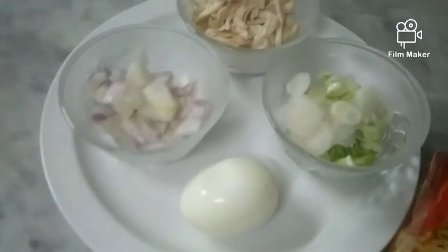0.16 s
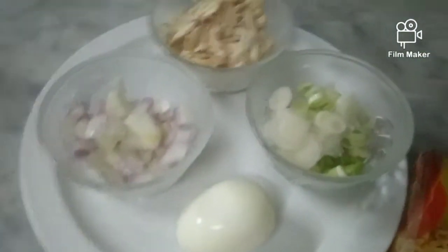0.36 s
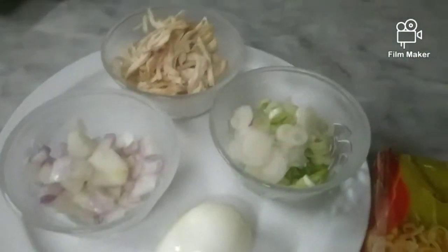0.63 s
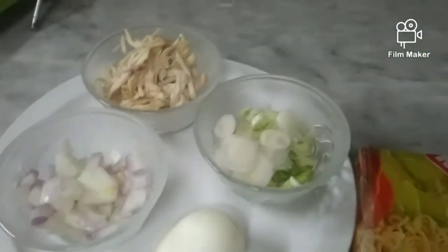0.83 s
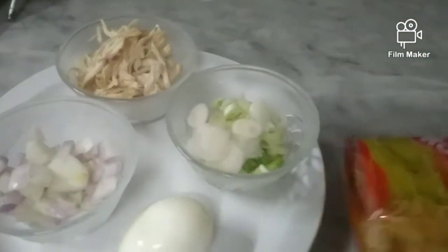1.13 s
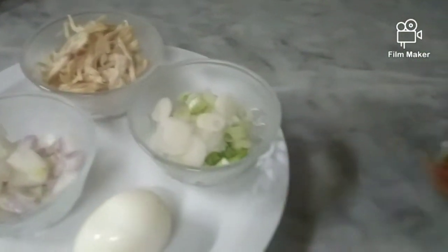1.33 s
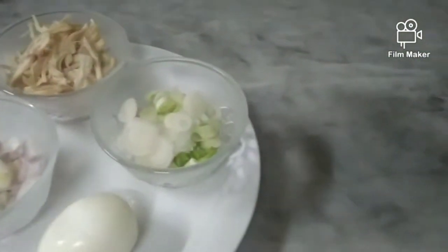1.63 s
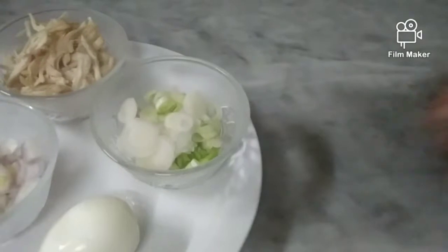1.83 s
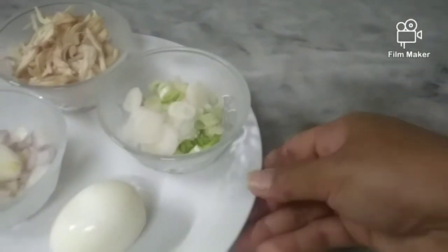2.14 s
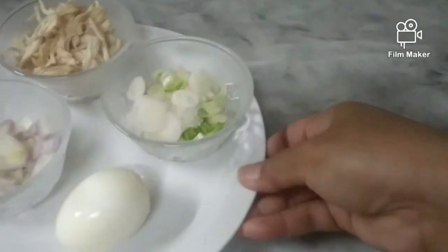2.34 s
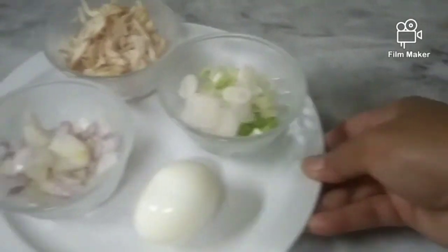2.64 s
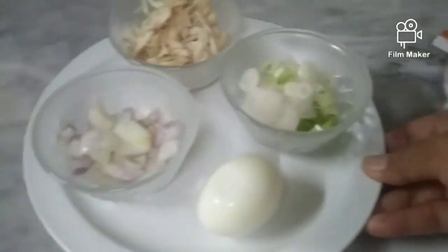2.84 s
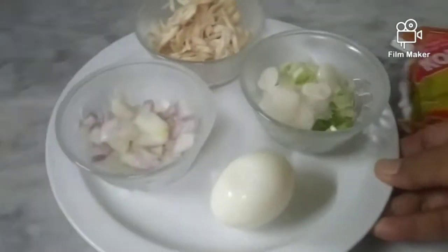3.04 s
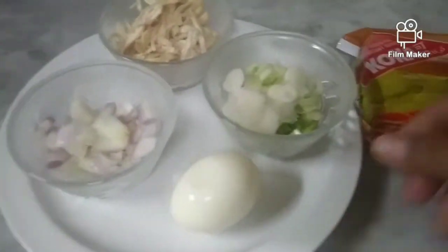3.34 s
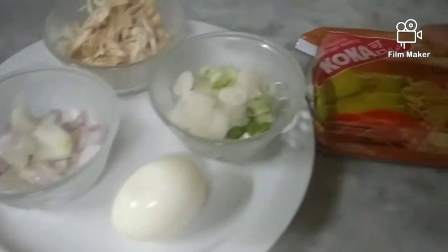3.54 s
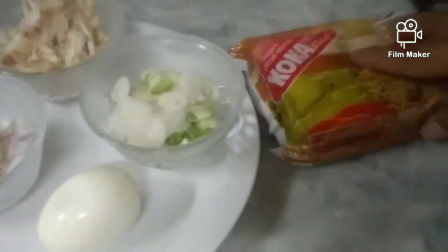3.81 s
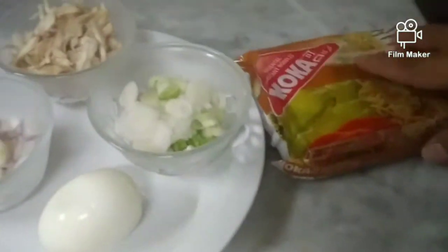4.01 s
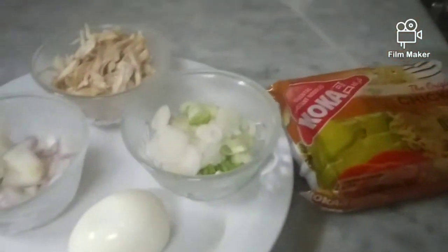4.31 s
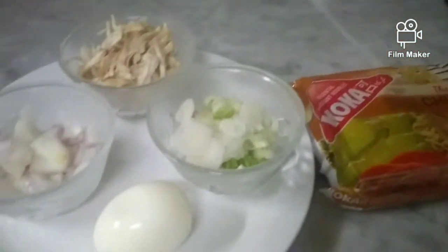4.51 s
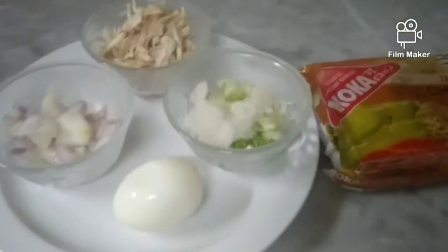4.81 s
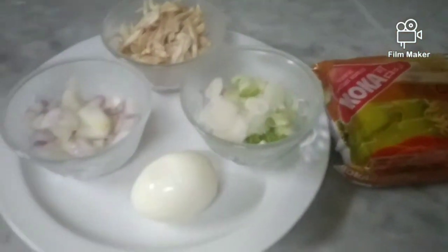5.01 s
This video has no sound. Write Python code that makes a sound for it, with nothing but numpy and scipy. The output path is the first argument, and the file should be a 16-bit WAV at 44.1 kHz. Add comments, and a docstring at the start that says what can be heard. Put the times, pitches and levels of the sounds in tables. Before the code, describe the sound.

Close by in a small, slightly echoing kitchen, thin plastic snaps and rustles as a packet of dry noodles is lifted. Next a china plate grates over the stone counter for about a second, chinking and juddering as it stops. The packet comes back, crinkling and bumping softly down, then scuffs across the counter in brief pushes. A faint appliance hum continues underneath.

```python
"""A crinkle and a sharp snap of plastic film: a noodle packet is picked up from a stone kitchen counter.
Its creases snap over a fine rustle and its panels buckle with hollow pops. A china plate is slid round,
its unglazed foot grating on the stone and ringing the plate's modes. Then the packet is laid down with
dull thuds and dragged in short shoves. A small hard room answers, over a low appliance hum."""
import sys
import numpy as np
from scipy import signal
from scipy.fft import rfft, irfft
from scipy.io import wavfile
from scipy.ndimage import uniform_filter1d

SR = 44100
rng = np.random.default_rng(int(sys.argv[2]) if len(sys.argv) > 2 else 0)


def store_wav(level_fs):
    """Save 16-bit WAV to argv[1]."""
    pcm = np.round(np.clip(np.atleast_2d(level_fs), -1, 1) * 32767)
    wavfile.write(sys.argv[1], SR, pcm.T.astype(np.int16))


N = 227732
TIME = np.arange(N) / SR


def undb(db):
    """Decibels to gain."""
    return 10 ** (np.asarray(db) / 20)


def unit(x):
    """Scale to rms 1."""
    return x / np.sqrt(np.mean(x ** 2))


def response(points, size=2048):
    """Causal impulse response with the given (Hz, dB) spectrum."""
    hz, db = np.transpose(points)
    grid = np.maximum(np.arange(size // 2 + 1) * SR / size, 1)
    gain = undb(np.interp(np.log(grid), np.log(hz), db))
    cepstrum = irfft(np.log(gain))
    cepstrum[1:size // 2] *= 2
    cepstrum[size // 2 + 1:] = 0
    return irfft(np.exp(rfft(cepstrum)))


def colour(x, points, size=2048):
    """Filter with a (Hz, dB) spectrum."""
    return signal.fftconvolve(x, response(points, size))[:len(x)]


def resonate(x, hz, width_hz):
    """One resonance, gain 1 at its centre."""
    return signal.lfilter(*signal.iirpeak(hz, hz / width_hz, fs=SR), x)


def ring(slips, modes):
    """Every slip strikes another spot, so each mode takes its own share of it."""
    out = np.zeros(N)
    for hz, width, db in modes:
        share = resonate(slips * rng.standard_normal(N), hz, hz / 2)
        out += undb(db) * resonate(share, hz, width)
    return unit(out)


def wander(rate_hz):
    """Smooth random drift, spread near 1."""
    span = max(int(SR / rate_hz), 2)
    steps = np.repeat(rng.standard_normal(N // span + 1), span)
    return np.sqrt(2) * uniform_filter1d(steps, span)[:N]


def ticks(per_s, spread_db):
    """Random tiny impulses; a positive spread makes a few stronger, a negative one a few weaker."""
    size_db = spread_db * np.minimum(rng.exponential(size=N), np.pi)
    return (rng.random(N) < per_s / SR) * undb(size_db) * rng.choice([-1, 1], N)


def stroke(start_s, attack_s, hold_s, release_s):
    """One movement of the hand: it builds up, holds and dies away."""
    since = TIME - start_s
    return np.clip(since / attack_s, 0, 1) * np.exp(-np.maximum(since - attack_s - hold_s, 0) / release_s)


def strokes(rows, attack_s, release_s):
    """Gain curve of several alike movements, from (start s, hold s, dB) rows."""
    return sum(undb(db) * stroke(s, attack_s, hold_s, release_s) for s, hold_s, db in rows)


def arch(start_s, length_s):
    """Half a sine: from rest up to 1 and back to rest."""
    along = (TIME - start_s) / length_s
    return np.maximum(np.sin(np.pi * along), 0) * (along > 0) * (along < 1)


def add(track, s, sound):
    """Mix a sound in at a given time."""
    start = max(int(s * SR), 0)
    track[start:start + len(sound)] += sound[:N - start]


def hit(sound, db):
    """Scale a short sound so that its total energy sits at the given level."""
    return undb(db) * sound / np.linalg.norm(sound)


# Grips on the packet. Each row: start in seconds, hold in seconds, relative level in dB.
GRIPS = [(-0.03, 0.0088, -46), (0.96, 0.11, -35), (1.15, 0.16, -35.5), (1.47, 0.1, -50), (1.65, 0.093, -45),
         (3.645, 0.005, -36.5), (3.705, 0.053, -37), (4.02, 0.065, -42.5), (4.34, 0.045, -49.5)]

def squeeze():
    """How hard the fingers crumple the film; drives the crinkle and the small snaps."""
    return strokes(GRIPS, attack_s=0.0095, release_s=0.07)


# Film sliding over film. Each row: start, attack and hold in seconds, relative level in dB.
SLIDES = [(-0.03, 0.0091, 0.03, -49), (0.65, 0.23, 0.1, -57), (1.172, 0.31, 0.092, -36.5),
          (1.69, 0.024, 0.06, -52), (3.639, 0.04, 0.19, -42.5), (3.87, 0.22, 0.096, -50),
          (4.337, 0.032, 0.036, -58.5)]
# EQ for the mid-heavy crinkle and the bright sliding hiss. Each row: frequency in Hz, gain in dB.
CRINKLE_EQ = [(100, -19.5), (300, 7), (600, 5), (1000, 7.5), (2500, 4.5), (4000, 1.5), (6500, -2.5),
              (9000, -19), (16000, -28)]
HISS_EQ = [(1500, -8), (4000, -1), (6500, -2.5), (8300, -6), (10000, 4.5), (11300, -4), (13000, -15),
           (15500, -11)]

def rustle(crinkle_db=-2, hiss_db=-1, hollow_db=2):
    """Countless small creases give way in flurries and ring the packet's hollow; sliding film hisses."""
    creases = unit(ticks(per_s=900, spread_db=1.0) * undb(2 * wander(70)))
    grains = unit(ticks(per_s=6000, spread_db=0.0) * undb(3.15 * wander(90)))
    hollow = undb(hollow_db) * resonate(creases, hz=1330, width_hz=340)
    crinkle = unit(colour(creases, CRINKLE_EQ) + hollow) * squeeze()
    sliding = sum(undb(db) * stroke(s, attack, hold, release_s=0.064) for s, attack, hold, db in SLIDES)
    hiss = unit(colour(grains + .5 * creases, HISS_EQ)) * sliding
    return undb(crinkle_db) * crinkle + undb(hiss_db) * hiss


# EQ for the low room tone. Each row: frequency in Hz, gain in dB.
ROOM_TONE_EQ = [(25, -31), (48, -4.5), (100, 0), (160, 0.5), (240, -7), (360, -1.5), (600, -7.5),
                (1000, -12), (1600, -16.5), (3000, -26), (8200, -33.5), (9300, -30), (11600, -28.5),
                (12800, -39)]
# Partials of an appliance's hum. Each row: frequency in Hz, level in dB.
HUM = [(97, -55), (124, -56.5), (194, -58.5), (291, -63), (533, -69.5)]
# Slow swell of a thin high hiss. Each row: time in seconds, level in dB.
WHINE_SWELL = [(0, -91), (4.3, -68), (4.7, -71), (5.16, -67.5)]

def kitchen(air_db=-49, whine_hz=9200, whine_width_hz=300):
    """The bed under it all: room tone, a wavering appliance hum and a thin high hiss that creeps in."""
    air = unit(colour(rng.standard_normal(N), ROOM_TONE_EQ, size=8192)) * undb(air_db + .5 * wander(20))
    hum = np.zeros(N)
    for hz, db in HUM:
        peak = np.sqrt(2) * undb(db + 2.73 * wander(9))
        pitch_hz = hz + 2.34 * wander(12)
        hum += peak * np.sin(2 * np.pi * np.cumsum(pitch_hz) / SR)
    band = resonate(rng.standard_normal(N), whine_hz, whine_width_hz)
    swell = undb(np.interp(TIME, *np.transpose(WHINE_SWELL)))
    whine = unit(resonate(band, whine_hz, whine_width_hz)) * swell
    return air + hum + whine


def small_snaps(per_s=60, above_squeeze_db=23, spread_db=2.5, treble_db=-3, treble_spread_db=7):
    """Lesser creases snap at random, as strong as the squeeze of the moment; returns rows like SNAPS."""
    chance = rng.standard_normal(size=(400, 4))
    times = np.cumsum((chance[:, 0] ** 2 + chance[:, 1] ** 2) / 2) / per_s
    squeeze_db = 20 * np.log10(np.interp(times, TIME, squeeze()) + 1e-9)
    levels = squeeze_db + above_squeeze_db + spread_db * chance[:, 2]
    trebles = treble_db + treble_spread_db * chance[:, 3]
    return list(np.column_stack([times, levels, trebles])[times < TIME[-1]])


# The featured crease snaps. Each row: start in seconds, relative level in dB, treble lift in dB.
SNAPS = [(0.1045, 8, -5), (0.2328, -16, -20), (0.26, -15, -27), (0.279, -15.5, -13), (0.3017, -9.5, -15),
         (0.5581, -21.5, 12), (0.562, -11.5, 3.5), (0.9502, -7, 7), (0.9892, -6, -15), (1.0161, -3, 1),
         (1.0556, 4.5, 10), (1.1208, 0.5, 1), (1.126, -4.5, 5), (1.1567, 6, -1), (1.162, -4.5, 11.5),
         (1.1738, 0.5, 4), (1.25, -5.5, 3), (1.2693, 0.5, 8.5), (1.2774, 4, -10), (1.2923, 11.5, -6),
         (1.3122, -1, -5), (1.358, 6.5, -3), (1.6663, -6, -8), (1.7425, -7, -19), (1.7713, 0.5, -5.5),
         (1.8163, -11, 2), (1.8921, -13.5, -2), (3.6542, -6, -5), (3.6666, -2, -5), (3.671, 4, 0),
         (3.73, -0.5, 4), (3.7344, -0.5, -10), (3.757, -4.5, 6.5), (3.78, 3, -17), (3.8896, -0.5, -5.5),
         (3.9866, -5, -16), (4.0695, -5, -11), (4.0821, 6, -4), (4.185, -13, 6.5), (4.264, -14.5, -8),
         (4.2832, -10.5, -5)]
# The film's tone, laid over every snap. Each row: frequency in Hz, gain in dB.
FILM_EQ = [(80, -50), (250, -1), (600, -3.5), (1200, 2), (3000, -1.5), (6000, -2), (8300, -7), (10200, 2.5),
           (11500, -6), (13000, -12.5), (16000, -22)]

def snaps(shiver_s=0.0019, shiver_db=-2.5, slack_body_db=4):
    """Each crease flips with a sharp spike, then the film shivers; returns direct and all-round sound."""
    direct, around, t = np.zeros(N), np.zeros(N), np.arange(SR // 40) / SR
    # the film damps treble at once, so mostly the middle range shivers on
    damping = signal.butter(1, 3500, fs=SR, output="sos")
    for s, db, treble_db in SNAPS + small_snaps():
        # slack creases give way softly and sound hollow, taut ones crack loud and thin
        body_db = min(-0.5 - 0.9 * db, slack_body_db)
        tone = [(500, body_db - 3.0), (1300, body_db), (2300, 0), (3800, 0), (8000, treble_db)]
        spike = undb(db) * response(tone)
        shiver = signal.sosfilt(damping, rng.standard_normal(len(t))) * np.exp(-t / shiver_s)
        click = hit(shiver, shiver_db)
        click[0] = 1  # the flip itself
        add(direct, s, signal.fftconvolve(hit(click, 0), spike))
        # summed over all directions the shiver's colour evens out
        add(around, s, spike)
    return colour(direct, FILM_EQ), colour(around, FILM_EQ)


# Hollow pops. Each row: start in seconds, level in dB, pitch in Hz, bandwidth in Hz.
POPS = [(0.281, -12, 1520, 350), (0.559, -12.5, 1780, 220), (0.5621, -8.5, 1870, 198),
        (0.5625, -7, 2130, 218), (0.9507, -10, 1200, 400), (1.059, -3.5, 1370, 198), (1.19, -4, 1970, 600),
        (1.738, -12, 1350, 500), (1.761, -6, 2330, 493), (3.987, -5.5, 1320, 250), (4.083, -2.5, 1360, 398)]

def pops():
    """A panel of the packet buckles and rings for a few cycles."""
    out, t = np.zeros(N), np.arange(SR // 30) / SR
    for s, db, hz, width in POPS:
        pop = np.sin(2 * np.pi * hz * t) * np.exp(-np.pi * width * t)
        add(out, s, hit(pop, db))
    return out


# The hand brushing on and off. Each row: start in seconds, hold in seconds, relative level in dB.
BRUSHES = [(0.73, 0.45, -58), (1.78, 0.03, -43.5)]

def brush(brush_db=-1):
    """Skin slides over the film with a soft swish."""
    tone = [(1000, -9.5), (2000, -8.5), (2450, 2), (2750, -6), (3100, -6.5), (4200, -14.5), (8000, -46)]
    swish = colour(ticks(per_s=6000, spread_db=-1.5), tone)
    return undb(brush_db) * unit(swish) * strokes(BRUSHES, attack_s=0.074, release_s=0.14)


# The china's ring, for chinks and grating alike. Each row: pitch in Hz, bandwidth in Hz, gain in dB.
PLATE_MODES = [(643, 310, -16), (742, 51, -7.5), (915, 130, -7.5), (1210, 140, -3.5), (1470, 52, 5),
               (1575, 30, 2.5), (1648, 99, 4), (1700, 30, -1), (1850, 140, -1.5), (2006, 45, 4.5),
               (2138, 83, 3.5), (2226, 120, 1.5), (2460, 70, -6), (2670, 480, -7.5), (3240, 43, 1),
               (3303, 81, 6), (3850, 91, -2.5), (4740, 97, -6), (5600, 23, -1.5), (5650, 84, -5.5),
               (6040, 68, -8), (6420, 80, -13), (7370, 67, -11), (8400, 87, -6.5), (10330, 67, -24),
               (10050, 180, -13.5), (10230, 76, -11), (11260, 81, -15), (13300, 60, -23), (14330, 80, -21)]
# Bright chinks. Each row: start in seconds, relative level in dB.
CHINKS = [(2.316, -29), (2.354, -22), (2.528, -13), (2.882, 0), (2.884, 1), (2.938, -4), (3.17, -1)]

def chinks():
    """The foot catches on a grain, or a fingernail meets the rim, and the plate's modes ring out."""
    out, t = np.zeros(N), np.arange(SR // 20) / SR
    for s, db in CHINKS:
        chink = sum(undb(mode_db) * rng.normal() * np.sin(2 * np.pi * hz * t) * np.exp(-np.pi * width * t)
                    for hz, width, mode_db in PLATE_MODES)
        add(out, s, hit(chink, db))
    return out


# Fingers landing on the plate. Each row: start in seconds, relative level in dB.
TOUCHES = [(2.396, -13.5), (2.399, -15.5), (2.403, -19), (2.407, -14.5)]

def touches():
    """Soft fingertips knock dully on the rim."""
    out = np.zeros(N)
    tone = [(150, -9), (400, 15), (700, 0), (1500, 4), (2400, 3), (3200, -22), (5000, -13), (9000, -56)]
    knock = response(tone)
    for s, db in TOUCHES:
        add(out, s, hit(knock, db))
    return out


# EQ for the dry grit under the ring. Each row: frequency in Hz, gain in dB.
GRIT_EQ = [(100, -15), (300, -1.5), (600, 5), (2300, -2.5), (3000, -3), (4400, -19), (8000, -16),
           (11300, -14), (12300, -37), (16000, -28)]
# Low judder of the loaded plate. Each row: pitch in Hz, bandwidth in Hz, gain in dB.
JUDDER_MODES = [(397, 26, 2), (448.3, 11, 6), (482, 6.3, 6.5)]

def plate_slide(push_db=-22.5, grit_db=-9, patch_db=3.5, shudder_db=-41.5, braking_db=-40):
    """In one push of the plate, its unglazed foot catches on the stone's grain in quick uneven slips."""
    slips = ticks(per_s=3000, spread_db=3.0) * undb(0.53 * wander(130))
    grating = ring(slips, PLATE_MODES) + undb(grit_db) * unit(colour(slips, GRIT_EQ))
    speed = arch(start_s=2.4216, length_s=0.99) ** 1.85  # the power eases the start and the stop
    friction = speed / (speed + 0.32)  # grows little above a third of the top speed
    rough_patch = arch(start_s=2.845, length_s=0.086)
    grating_gain = undb(push_db + patch_db * rough_patch) * friction
    # the foot judders lightly all the way, and hardest as the plate slows down
    braking = arch(start_s=2.89, length_s=0.46)
    judder_gain = undb(shudder_db) * friction + undb(braking_db) * braking
    return grating_gain * grating + judder_gain * ring(slips, JUDDER_MODES)


# The packet touching down. Each row: start in seconds, level in dB.
THUDS = [(3.67, -18), (3.735, -18), (3.778, -13), (3.953, -13)]
# EQ for the dull thud. Each row: frequency in Hz, gain in dB.
THUD_EQ = [(60, -14), (170, 1), (600, -3), (1200, -3), (3000, -35), (8000, -55)]

def thuds():
    """The dry block of noodles bumps down on the counter."""
    out, thud = np.zeros(N), response(THUD_EQ)
    for s, db in THUDS:
        add(out, s, hit(thud, db))
    return out


# Short shoves of the packet. Each row: start in seconds, hold in seconds, relative level in dB.
SHOVES = [(3.948, 0.09, -37.5), (4.1, 0.083, -39), (4.254, 0.01, -45), (4.33, 0.085, -44.5),
          (4.414, 0.022, -40.5), (4.482, 0.0084, -44)]
# The packet's hollow body. Each row: pitch in Hz, bandwidth in Hz, gain in dB.
PACKET_MODES = [(807, 64, -5.5), (1230, 110, -19), (1820, 130, 2), (2096, 68, 2.5), (2650, 85, 4),
                (2900, 110, -14), (6360, 510, -7.5), (10200, 1200, -7)]

def rub(rub_db=-1):
    """The packet sticks and slips as it is dragged over the counter, ringing its hollow resonances."""
    slips = ticks(per_s=1800, spread_db=-2.0) * undb(1.8 * wander(90))
    tone = [(200, 11), (700, 9.5), (2900, 0.5), (3500, 7.5), (7000, -10), (14000, -14)]
    body = colour(ring(slips, PACKET_MODES), tone)
    return undb(rub_db) * unit(body) * strokes(SHOVES, attack_s=0.011, release_s=0.0062)


def room(x, tail_db, early_db, low_t60_s=0.57, treble_t60_s=0.24):
    """Echoes only: nearby surfaces reflect first; hard walls leave a tail whose treble dies sooner."""
    t = np.arange(int(SR * low_t60_s)) / SR
    noise = rng.standard_normal(len(t))
    low = signal.sosfilt(signal.butter(1, 5000, fs=SR, output="sos"), noise)
    treble = noise - low
    tail = (low * undb(-60 * t / low_t60_s) + treble * undb(-60 * t / treble_t60_s)) * (t > .005)
    early = rng.standard_normal(len(t)) ** 3 * np.exp(-t / 0.008) * (t > .001)
    return signal.fftconvolve(x, hit(tail, tail_db) + hit(early, early_db))[:N]


def scene(china_db=-2.0):
    """The mono mix: packet and plate, each with its own reverb, over the kitchen bed."""
    snaps_direct, snaps_around = snaps()
    film = rustle() + brush()
    hollow = rub() + pops() + thuds()
    # the small panels beam upward and stir the room less
    send = snaps_around + film + undb(-5) * hollow
    packet = snaps_direct + film + hollow + room(send, tail_db=-6.5, early_db=-5.5)
    china = plate_slide() + touches() + chinks()
    china = china + room(china, tail_db=-7.5, early_db=-30)
    return (packet + undb(china_db) * china + kitchen())[None]


def record(dry, low_cut_hz=38, high_cut_hz=15750):
    """Master EQ: roll off the deep bass and cut the very top steeply."""
    thin = signal.sosfilt(signal.butter(4, low_cut_hz, "high", fs=SR, output="sos"), dry)
    return signal.sosfilt(signal.ellip(8, .2, 70, high_cut_hz, fs=SR, output="sos"), thin)


dry = scene()
out = record(dry)
store_wav(out)
```